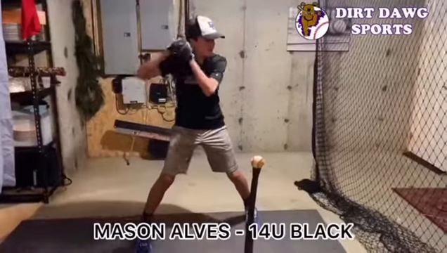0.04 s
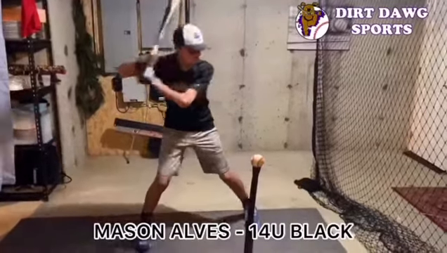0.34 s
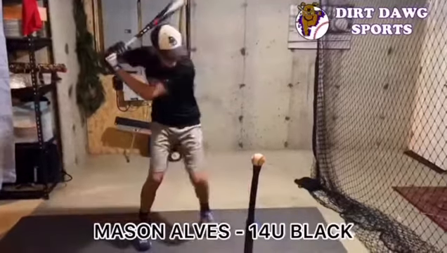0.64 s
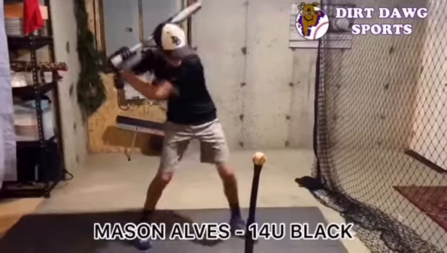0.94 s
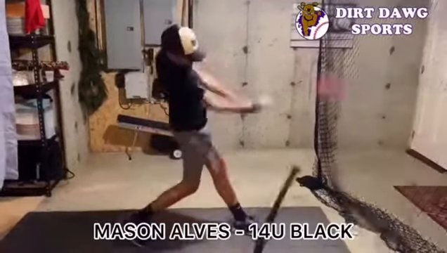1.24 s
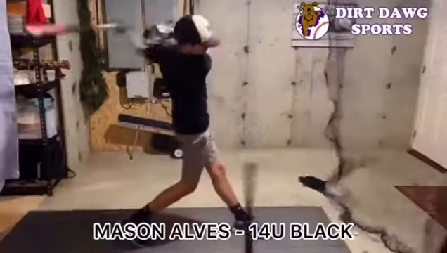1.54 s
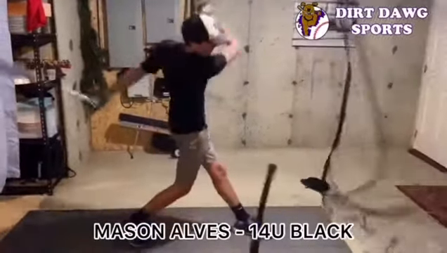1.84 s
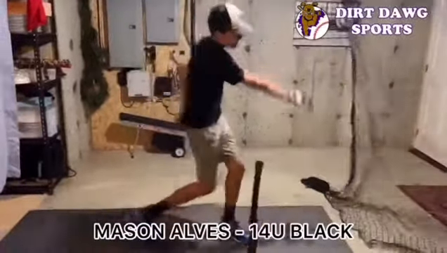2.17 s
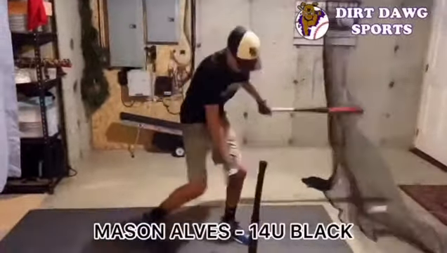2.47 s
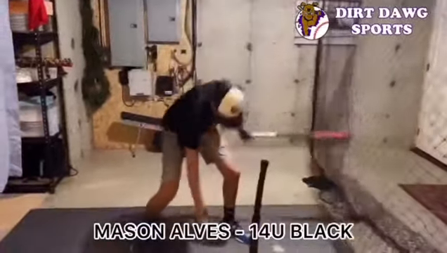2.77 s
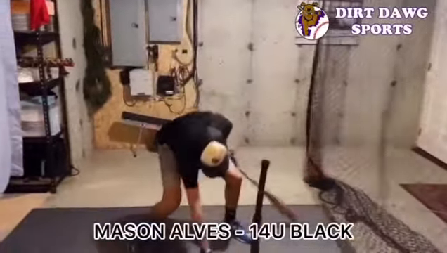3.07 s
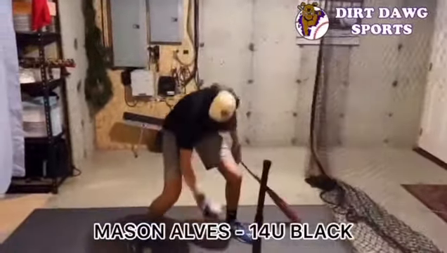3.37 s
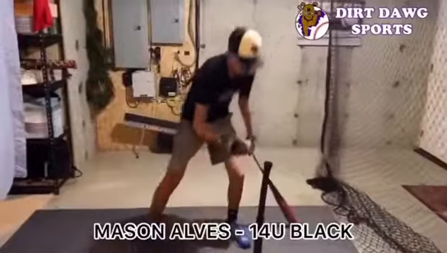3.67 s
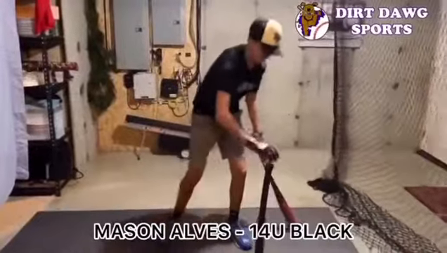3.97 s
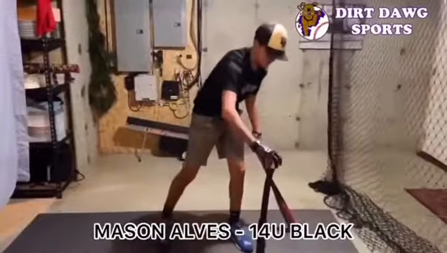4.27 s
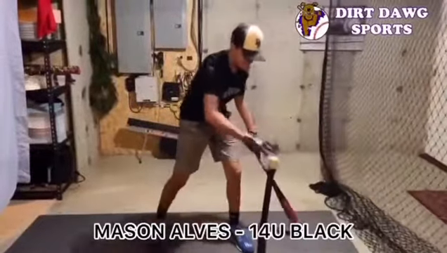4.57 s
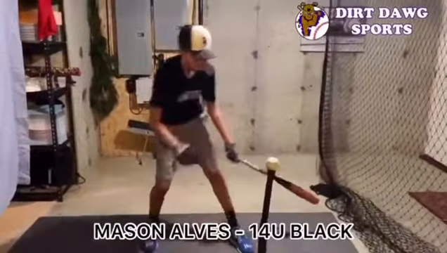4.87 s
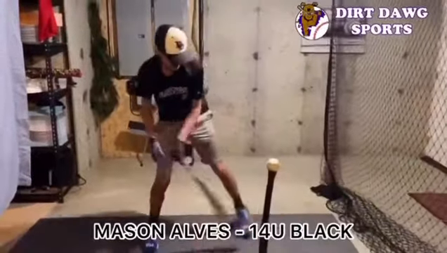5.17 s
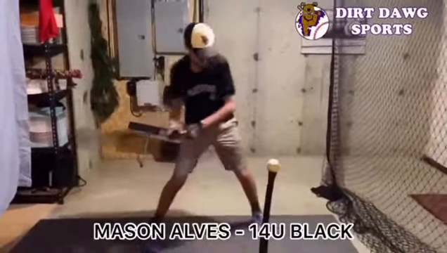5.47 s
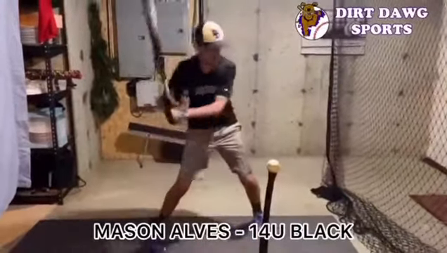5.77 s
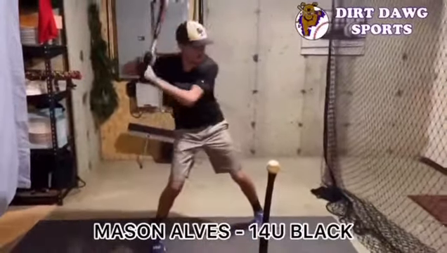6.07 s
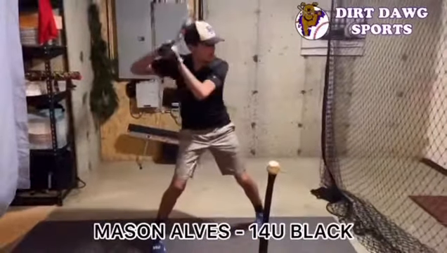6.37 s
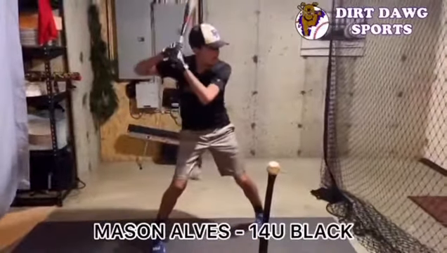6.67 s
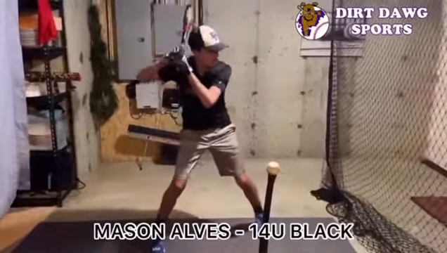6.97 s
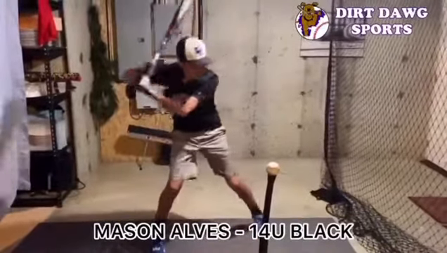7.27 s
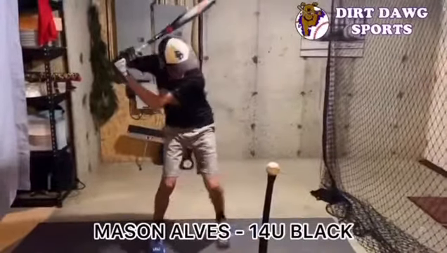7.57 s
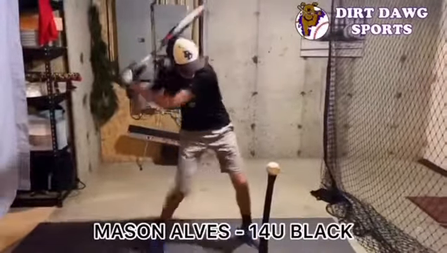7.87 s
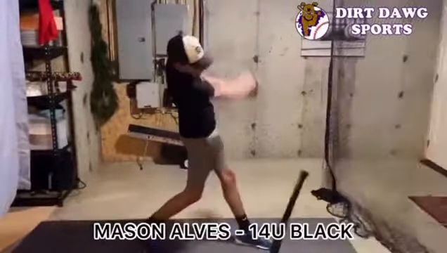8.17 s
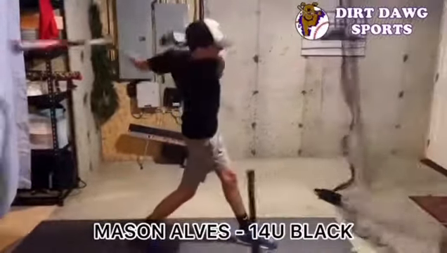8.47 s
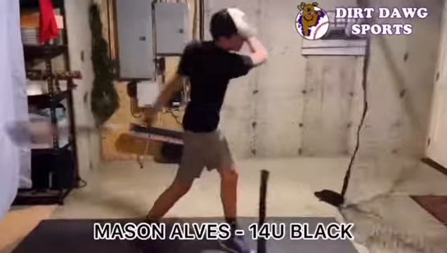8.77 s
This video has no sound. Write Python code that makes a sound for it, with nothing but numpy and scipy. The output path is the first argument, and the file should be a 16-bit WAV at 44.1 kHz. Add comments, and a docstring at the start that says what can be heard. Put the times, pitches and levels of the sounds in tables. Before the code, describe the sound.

Two sharp, ringing bat hits indoors, each followed by a clattering tee and a dropping ball, with faint rustling between them.

```python
"""A concrete basement batting cage: two swings at a baseball on a tee. The metal bat cracks and rings,
its tone split by Doppler shift as the barrel sweeps on. The tee rocks and claps down on its base,
the net sways and swishes, the ball drops onto concrete and bounces across a rubber mat.
Shoes scuff and clothes rustle over a low room rumble."""
import sys
import numpy as np
from scipy import signal
from scipy.fft import rfft, irfft, next_fast_len
from scipy.io import wavfile
from scipy.ndimage import uniform_filter1d, map_coordinates

SR = 44100
rng = np.random.default_rng(int(sys.argv[2]) if len(sys.argv) > 2 else 0)


def transcribe(signal):
    """Save signal, clipped to [-1, 1], as a 16-bit WAV file at the path in sys.argv[1]."""
    frames = np.atleast_2d(signal).T
    limited = np.clip(frames, -1, 1)
    pcm = np.round(limited * 32767).astype(np.int16)
    wavfile.write(sys.argv[1], SR, pcm)


N = 398480

# Bat meets ball. Each row: start in seconds, crack in dB, barrel tone in dB, its t60 in seconds,
# head start of the barrel's turn in seconds, air push in dB, its fall in seconds, net swish in dB.
HITS = [(0.9239, 11, -26.5, 0.75, 0.0022, -38.5, 0.091, -1),
        (7.7938, 10, -27.5, 0.67, 0.0029, -42, .035, -6.5)]
# Hollow knock of bat and ball. Each row: frequency in Hz, level in dB, t60 in seconds.
KNOCK_MODES = [(362, 1, 0.21), (609, -2.5, 0.15), (764, 0, .09), (1032, -2, .08), (1117, -3, 0.13)]
# The barrel's other modes. Each row: frequency in Hz, level in dB in hit one, the same in hit two,
# t60 in seconds, share of bat speed at the radiating part.
BARREL_MODES = [(2340, -33, -37, 0.22, .55), (2989, -28.5, -21.5, .28, 0.93),
                (3843, -19, -27.5, .165, 0.48), (4830, -41, -40.5, 0.33, 0.78), (6780, -43, -38, 0.29, 1)]
# The turning barrel beams its tone at the microphone. Each row: time after contact in seconds,
# width in seconds, dB over the tone off the walls, share of bat speed toward the microphone.
BEAMS = [(.006, .007, 12, -0.85), (.024, .009, 13.5, .9), (.051, .015, 18, -.86), (.11, 0.033, 4.5, .99),
         (0.256, 0.049, 10.5, -.3)]
# Ball on concrete, ball on mat, shoes on mat and, at 5.971 s, a light tap of the bat on the batter. # Each row:
# start in seconds, blow in dB, thump in dB, treble tilt in dB per octave.
DROPS = [(1.977, 0.5, -23.5, -1), (8.857, -1, -26, .5)]
BOUNCES = [(2.472, -8, -21, -0.5), (2.84, -15.5, -26, 1.5), (3.097, -35, -31, -4)]
STEPS = [(0.314, -16, -31, 0.5), (3.735, -48, -38.5, -8), (5.971, -25.5, -39.5, -12.5),
         (7.179, -38, -39, -13), (7.202, -17, -28.5, -2)]
# The tee's base lands. Each row: start in seconds, blow in dB, thump in dB, resonance in Hz.
TEE_CLAPS = [(1.472, -1, -23.5, 1440), (8.298, -6.5, -30, 1356)]
# Its ring. Each row: multiple of the resonance, dB against the blow, t60 in seconds.
TEE_MODES = [(1, -13.5, 0.027), (1.18, -18, 0.021), (2.42, -25.5, 0.016)]
# Tee and net frame shake. Each row: start in seconds, blow in dB, thump in dB, length in seconds.
RATTLES = [(1.124, -21.5, -38.5, 0.043), (1.259, -16.5, -28.5, 0.037), (1.273, -15, -26, 0.061),
           (1.545, -15, -41.5, .07), (2.368, -34.5, -55, .05), (2.437, -21, -53, 0.38),
           (7.975, -18.5, -39, 0.1), (8.087, -15, -31.5, 0.025), (8.419, -11.5, -44, .08),
           (8.72, -32, -49, 0.055)]
# Gear, ball and net fittings. Each row: start in seconds, blow in dB, treble tilt in dB per octave.
TAPS = [(1.275, -17, -6), (4.323, -51, 0.5), (4.697, -40, -2), (5.062, -43.5, -8), (5.665, -51, 2),
        (5.896, -48, 1), (5.971, -32, -5.5), (8.091, -19, -9.5), (8.424, -15.5, -1.5), (8.731, -18.5, 3)]
# Soft footfalls. Each row: start in seconds, thump in dB.
FOOTFALLS = [(3.919, -56.5), (4.038, -57), (4.381, -58.5), (4.634, -64.5), (5.017, -64), (5.302, -60.5),
             (6.387, -67)]
# Low ring of floor and mat. Each row: frequency in Hz, level in dB, t60 in seconds.
FLOOR_MODES = [(61.47, -15.5, 0.24), (100.5, -17, 0.33), (154.7, -3.5, 0.15), (193.3, -4.5, 0.16),
               (247, -6, 0.092)]
# Clothes and gloves rub; the floor rumbles as the batter shifts weight.
# Each row: start in seconds, level in dB, rise in seconds, fall in seconds.
RUBS = [(.09, -58.5, 0.069, 0.081), (.648, -49, 0.034, 0.029), (2.67, -65, 0.093, 0.061),
        (3.06, -69, 0.031, 0.1), (3.18, -59, 0.095, 0.065), (3.38, -49, 0.22, 0.079),
        (4.3, -65, 0.057, 0.043), (4.57, -61, 0.083, 0.099), (4.65, -59.5, 0.089, 0.095),
        (5.04, -69, .04, 0.16), (5.21, -59.5, 0.13, .045), (5.43, -71.5, 0.057, .04),
        (5.63, -75, 0.043, 0.022), (5.7, -76.5, 0.13, 0.057), (6.94, -67.5, 0.085, 0.027),
        (7.03, -60, .05, 0.041), (7.494, -56.5, 0.03, 0.028)]
WEIGHT_SHIFTS = [(.05, -64, 0.13, 0.17), (.6, -55.5, .5, .3), (2.4, -59.5, .3, 0.71),
                 (3.1, -57, 0.26, 0.51), (7.4, -61, 0.58, 0.8)]
# Source spectra. Each row: frequency in Hz, relative density in dB.
CRACK_DB = [(40, -12.5), (120, -15), (230, -3.5), (360, -8.5), (500, -11), (780, -1.5), (1200, -3),
            (2000, -14.5), (3800, -14), (5500, -24.5), (12000, -28)]
CONCRETE_DB = [(100, -12.5), (220, 0.5), (400, -3.5), (650, 0.5), (1000, -6.5), (1500, -14.5),
               (3000, -19.5), (5600, -19.5), (8500, -27.5), (12000, -32)]
MAT_DB = [(100, -10.5), (230, 3), (330, -2), (480, -14), (800, -7.5), (1200, -5), (1700, -7.5), (3000, -15),
          (5000, -26.5), (8000, -25.5), (12000, -32)]
TEE_DB = [(100, -20.5), (200, -1.5), (550, -7), (1000, -8.5), (1500, -5.5), (2400, -21.5), (3400, -15.5),
          (4200, -23), (6800, -33.5), (12000, -48)]
FRAME_DB = [(120, -21.5), (200, 0), (420, -5), (920, -4.5), (1480, -12), (2500, -21), (5400, -23.5),
            (11000, -36.5)]
SHOE_DB = [(100, -28.5), (200, -5), (400, -5), (1640, -9.5), (4000, -11), (8000, -11.5), (12000, -22.5)]
CLOTH_DB = [(300, -23), (700, -9.5), (1100, -10), (1550, -7), (1870, -3), (2300, -10), (3000, -7),
            (4800, -11.5), (7100, -11.5), (10000, -16.5), (12000, -19)]
NET_DB = [(110, -29.5), (180, -0.5), (326, 6), (402, -8), (618, 0), (1250, -2), (1510, -7), (1900, -8),
          (2500, -22.5), (3250, -43), (5500, -120)]
RUMBLE_DB = [(20, -19), (42, -5), (70, -1.5), (115, -3.5), (150, -7.5), (250, -16), (335, -15),
             (420, -27.5), (600, -32.5), (1000, -59)]
HISS_DB = [(150, -18), (400, -6), (1000, -18.5), (1900, -16.5), (3400, -25.5), (12000, -32)]
# Basement reverberation. Each row: frequency in Hz, t60 in seconds.
ROOM_T60_S = [(100, .3), (300, 0.29), (800, 0.19), (2000, 0.27), (5000, 0.23), (12000, 0.21)]
# Width of diffuse sound. Each row: frequency in Hz, side against mid in dB.
WIDTH_DB = [(50, -20), (140, -14.5), (280, -10.5), (560, -4.5), (1100, 1), (2200, -7.5), (4500, -10.5),
            (11000, -10)]
# Microphone response. Each row: frequency in Hz, gain in dB.
MIC_DB = [(7000, 2), (8200, -1), (8950, -31), (9800, 2), (11500, 2)]
# Port imbalance. Each row: frequency in Hz, left over right in dB.
BALANCE_DB = [(50, -0.5), (200, -2.5), (700, -2.5), (1300, -3.5), (2600, 1.5), (4000, 1.5), (8000, 0),
              (11000, 0)]
# Port phase. Each row: frequency in Hz, lead of left over right in radians.
LEFT_LEAD_RAD = [(60, .1), (200, -.15), (430, -.5), (690, .5), (1200, -.7), (2000, .7), (2600, .75),
                 (4100, -.55), (7000, -.75), (9000, -1)]


def bat_crack(knock_db=-31.5):
    """The ball squashes against the barrel; the wave from its far side returns inverted off concrete."""
    out, t = np.zeros((2, N)), blow_time()
    air_spectrum_db = [(20, -5.5), (45, 1.5), (100, -2.5), (200, -15), (500, -58.0)]
    for start_s, db, *_, air_db, air_fall_s, _ in HITS:
        blow = basement(contact(length_s=.018, push=.9), wet_db=-5, echo=-.9, echo_s=.00465)
        add(out, start_s, amp(db) * coloured(blow, CRACK_DB))
        knock = sum(amp(mode_db - 60 * t / t60_s) * np.sin(2 * np.pi * (hz * t + rng.random()))
                    for hz, mode_db, t60_s in KNOCK_MODES)
        add(out, start_s, amp(db + knock_db) * knock * attack(t, .003))
        # the swing shoves a slow lump of air through the cage
        air = unit(coloured(rng.standard_normal(len(t)), air_spectrum_db))
        add(out, start_s - .05, amp(air_db) * air * swell(t, 0.019, air_fall_s, shape=0.98))
    return out


def bat_ring(barrel_hz=2676.5, grip_s=0.435, grip_fade_s=.05):
    """The barrel rings; its main tone flares as beams sweep past, until the hands damp it."""
    out, t = np.zeros((2, N)), blow_time()
    grip = np.exp(-np.maximum(t - grip_s, 0) / grip_fade_s)
    for hit, (start_s, _, tone_db, tone_t60_s, ahead_s, *_) in enumerate(HITS):
        beams = sum(amp(db) * np.exp(-((t + ahead_s - at_s) / width_s) ** 2) * doppler(barrel_hz, toward)
                    for at_s, width_s, db, toward in BEAMS)
        tone = beams + scattered(barrel_hz)
        add(out, start_s, amp(tone_db - 60 * t / tone_t60_s) * grip * tone * attack(t, .004))
        for hz, *levels_db, t60_s, share in BARREL_MODES:
            paths = 0.56 * doppler(hz, share) + 0.76 * doppler(hz, -share) + 0.32 * scattered(hz)
            add(out, start_s, amp(levels_db[hit] - 60 * t / t60_s) * paths * attack(t, 0.0027))
    return out


def doppler(hz, toward, speed_m_per_s=16, slowing_s=0.32):
    """A barrel mode on one path; toward is the share of bat speed along it. Approach raises the pitch."""
    t = blow_time()
    travel_m = np.cumsum(speed_m_per_s * np.exp(-(t / slowing_s) ** 2)) / SR
    return np.sin(2 * np.pi * (hz * (t + toward * travel_m / 343) + rng.random()))


def scattered(hz, count=10):
    """A mode off the walls, each path with its own Doppler shift and fade-in."""
    t, paths = blow_time(), []
    for k in range(count):
        toward = np.cos(np.pi * (k + rng.random()) / count)
        paths.append(doppler(hz, toward) * np.clip(t / rng.uniform(.002, 0.018), 0, 1))
    stereo_gains = 1 + 0.38 * rng.standard_normal((2, count))
    return stereo_gains @ np.array(paths) / np.sqrt(count / 2)


def ball():
    """The ball falls from the net onto bare concrete and bounces on across the rubber mat."""
    drops = floor_blows(DROPS, CONCRETE_DB, length_s=0.026, push=0.35, wet_db=-2, thump_rise_s=0.0021)
    bounces = floor_blows(BOUNCES, MAT_DB, length_s=0.011, push=0.086, wet_db=-2, thump_rise_s=.007)
    return drops + bounces


def tee_claps():
    """The tipped tee falls back on its base, which rings with a short hollow note."""
    out, t = np.zeros((2, N)), blow_time()
    for start_s, db, thump_db, hz in TEE_CLAPS:
        clap = coloured(basement(contact(length_s=0.011, push=0.38), wet_db=-6), TEE_DB)
        note = sum(amp(mode_db - 60 * t / t60_s) * np.sin(2 * np.pi * hz * ratio * t)
                   for ratio, mode_db, t60_s in TEE_MODES)
        add(out, start_s, amp(db) * (clap + note * attack(t, 0.0015)) + thump(thump_db, rise_s=0.018))
    return out


def shoes():
    """Shoes scuff and thump on the mat; at 5.97 s the bat taps lightly on the batter."""
    return floor_blows(STEPS, SHOE_DB, length_s=.06, push=0.2, wet_db=5.5, thump_rise_s=0.017)


def rattles():
    """The rocking tee and the net's frame shake in loose bursts."""
    out = np.zeros((2, N))
    for start_s, db, thump_db, length_s in RATTLES:
        shake = coloured(basement(contact(length_s, push=0.16), wet_db=4.5), FRAME_DB)
        add(out, start_s, amp(db) * shake + thump(thump_db, rise_s=0.0046))
    return out


def clothes_and_net(lead_s=0.29, rise_s=0.32, drag_delay_s=0.816):
    """Clothes rub, the bat whooshes; the net's folds swish, its mesh hisses and drags along the floor."""
    rub, air = swells(RUBS), np.zeros(N)
    for start_s, *_, swish_db in HITS:
        t = np.arange(N) / SR - start_s
        sleeves = amp(-41.5) * swell(t + lead_s, rise_s, fall_s=0.044, shape=0.9)
        whoosh = amp(-46.5) * swell(t + lead_s, rise_s, fall_s=0.054)
        swish = amp(-49.5 + swish_db) * net_sway(t, hold_s=0.606, fade_db_per_s=68)
        mesh = amp(-57) * net_sway(t, hold_s=0.96, fade_db_per_s=23)
        drag = amp(-55) * swell(t - drag_delay_s, rise_s=0.07, fall_s=0.036)
        rub += sleeves + np.hypot(mesh, drag)
        air += whoosh + swish
    rustle = rub * rush(CLOTH_DB, patchy_db=1.5, grain_db=1.16)
    return rustle + air * rush(NET_DB, patchy_db=4, grain_db=2.5)


def net_sway(since_hit_s, hold_s, fade_db_per_s):
    """Gain of the net once the ball reaches it: holds, then dies away, swelling once per sway."""
    flight_s, rise_s, period_s, crest_s, depth_db = .17, 0.021, .62, 0.083, 3
    t = np.maximum(since_hit_s - flight_s, 0)
    sway_db = depth_db * np.cos(2 * np.pi * (t - crest_s) / period_s)
    return np.minimum(t / rise_s, 1) * amp(sway_db - fade_db_per_s * np.maximum(t - hold_s, 0))


def taps_and_footfalls():
    """Gear, ball and net fittings tap lightly; soft footfalls thump the floor."""
    out = np.zeros((2, N))
    for start_s, db, tilt in TAPS:
        tap = basement(contact(length_s=.012, push=0.4), wet_db=-4)
        add(out, start_s, amp(db) * coloured(tap, CLOTH_DB, tilt))
    for start_s, db in FOOTFALLS:
        add(out, start_s, thump(db, rise_s=.014))
    return out


def room_tone(rumble_db=-68, hiss_db=-77.5):
    """A low rumble that grows as the batter shifts weight, with a very faint hiss."""
    level = np.hypot(amp(rumble_db), swells(WEIGHT_SHIFTS))
    rumble = rush(RUMBLE_DB, patchy_db=2.23, grain_db=1.03)
    return level * rumble + amp(hiss_db) * rush(HISS_DB, patchy_db=2.5, grain_db=-1.3)


def floor_blows(rows, spectrum, length_s, push, wet_db, thump_rise_s):
    """Blows of one kind, each with its own brightness and floor thump."""
    out = np.zeros((2, N))
    for start_s, db, thump_db, tilt in rows:
        knock = coloured(basement(contact(length_s, push), wet_db), spectrum, tilt)
        add(out, start_s, amp(db) * knock + thump(thump_db, thump_rise_s))
    return out


def thump(db, rise_s):
    """The floor's low modes answer a blow, detuned at random each time."""
    t, ring = blow_time(), 0
    for hz, mode_db, t60_s in FLOOR_MODES:
        detuned_hz = hz * (1 + 0.09 * rng.standard_normal())
        ring += amp(mode_db - 60 * t / t60_s) * np.sin(2 * np.pi * detuned_hz * t)
    return amp(db) * ring * attack(t, rise_s)


def contact(length_s, push):
    """Force of energy 1: one push plus a gritty burst that falls 60 dB in length_s."""
    t = blow_time()
    grit = rng.standard_normal(len(t)) * attack(t, 0.0036)
    grit *= amp(-60 * t / length_s + 1.9 * wobble(360, len(t)))
    force = grit / np.linalg.norm(grit)
    force[round(.0005 * SR)] += push
    return force / np.linalg.norm(force)


def basement(force, wet_db, echo=0.23, echo_s=.0048):
    """A blow, one hard reflection off the concrete, then a dense tail fed by the blow's power."""
    t = blow_time()
    hz, frame_s, bins = signal.stft(noise_pair(len(t)), SR, nperseg=256)
    decay = amp(-60 * frame_s / along(ROOM_T60_S, hz)[:, None])
    tail = signal.istft(bins * decay, SR, nperseg=256)[1][:, :len(t)]
    tail = tail * np.sqrt(np.cumsum(force ** 2)) * (1 - np.exp(-(t / 0.0066) ** 2))
    reflection = np.pad(force, (round(echo_s * SR), 0))[:len(t)]
    return force + echo * reflection + amp(wet_db) * tail / np.linalg.norm(tail[0])


def coloured(x, spectrum, tilt_db_per_octave=0, size=4096):
    """x through a minimum-phase body response of energy 1, tilted above 1500 Hz."""
    hz = np.fft.rfftfreq(size, 1 / SR)
    gain = amp(along(spectrum, hz) + tilt_db_per_octave * np.log2(np.maximum(hz / 1500, 1)))
    cepstrum = irfft(np.log(np.maximum(gain, 1e-5)))[:size // 2]
    cepstrum[0] /= 2
    body = irfft(np.exp(rfft(2 * cepstrum, size)))
    body /= np.linalg.norm(body)
    return signal.fftconvolve(np.atleast_2d(x), body[None], axes=1)[:, :x.shape[-1]]


def rush(spectrum, patchy_db, grain_db):
    """Stereo noise of rms 1 with drifting patches and a fine grain."""
    bins = signal.stft(noise_pair(N), nperseg=512)[2]
    patches = uniform_filter1d(rng.standard_normal(bins.shape[1:]), size=6, axis=0)
    patches = uniform_filter1d(patches, size=10, axis=1)
    pair = signal.istft(bins * amp(patchy_db * unit(patches)), nperseg=512)[1][:, :N]
    grainy = pair * amp(grain_db * wobble(250, N))
    return unit(filtered(grainy, lambda hz: amp(along(spectrum, hz))))


def noise_pair(size):
    """Noise from all sides at two closely spaced microphones."""
    mid, side = rng.standard_normal((2, size))
    side = filtered(side, lambda hz: amp(along(WIDTH_DB, hz)))
    return unit(np.array([mid + side, mid - side]))


def swell(t, rise_s, fall_s, shape=1.5):
    """Gain of one movement from t = 0: smooth rise, then fall."""
    rise = np.sin(np.pi / 2 * np.clip(t / rise_s, 0, 1)) ** 2
    return rise * np.exp(-(np.maximum(t - rise_s, 0) / fall_s) ** shape)


def swells(rows):
    """Gain of a table of movements, summed in power."""
    t = np.arange(N) / SR
    return np.sqrt(sum((amp(db) * swell(t - start_s, rise_s, fall_s)) ** 2
                       for start_s, db, rise_s, fall_s in rows))


def attack(t, rise_s):
    """Exponential rise from 0 to 1."""
    return 1 - np.exp(-t / rise_s)


def wobble(rate_hz, size):
    """Smooth random curve with knots at rate_hz."""
    knots = rng.standard_normal(int(size * rate_hz / SR) + 4)
    return map_coordinates(knots, [np.arange(size) * rate_hz / SR])


def filtered(x, gain):
    """x times a gain that depends on frequency."""
    size = x.shape[-1]
    padded = next_fast_len(size + 8192)
    return irfft(rfft(x, padded) * gain(np.fft.rfftfreq(padded, 1 / SR)), padded)[..., :size]


def along(points, hz):
    """(Hz, value) points read on a log axis."""
    knots_hz, values = np.transpose(points)
    return np.interp(np.log(hz + 1), np.log(knots_hz + 1), values)


def amp(db):
    """Decibels to gain."""
    return 10 ** (np.asarray(db) / 20)


def unit(x):
    """Scale to rms 1."""
    return x / np.sqrt(np.mean(x ** 2) + 1e-20)


def blow_time():
    """Time axis of one blow, 0.6 s."""
    return np.arange(SR * 3 // 5) / SR


def add(out, start_s, x):
    """Mix x into out from start_s."""
    part = out[:, round(start_s * SR):][:, :x.shape[-1]]
    part += x[..., :part.shape[1]]


def scene():
    """Everything in the cage."""
    blows = bat_crack() + bat_ring() + ball() + tee_claps() + shoes() + rattles()
    return blows + clothes_and_net() + taps_and_footfalls() + room_tone()


def record(dry, ceiling=.85, top_hz=11950):
    """Two unequal microphone ports with a treble dip, soft overload and a band limit."""
    def ports(hz):
        side = np.array([[.5], [-.5]])
        gain = amp(along(MIC_DB, hz) + side * along(BALANCE_DB, hz))
        return gain * np.exp(1j * side * along(LEFT_LEAD_RAD, hz))

    heard = filtered(dry, ports)
    heard = heard / (1 + (heard / ceiling) ** 6) ** (1 / 6)
    return filtered(heard, lambda hz: 1 / np.sqrt(1 + (hz / top_hz) ** 120))


dry = scene()
out = record(dry)
transcribe(out)
```